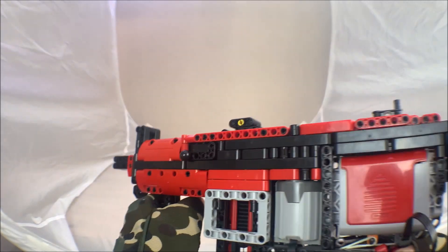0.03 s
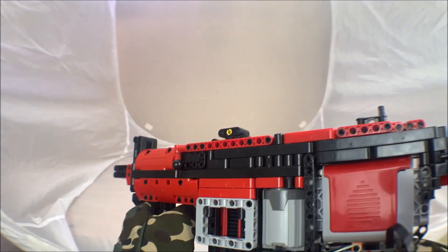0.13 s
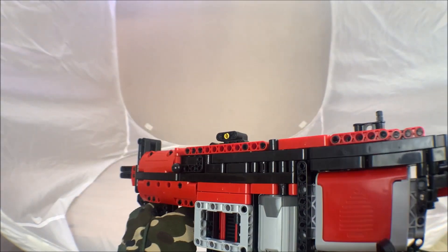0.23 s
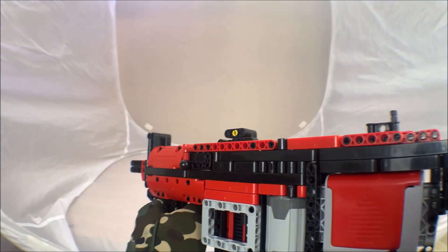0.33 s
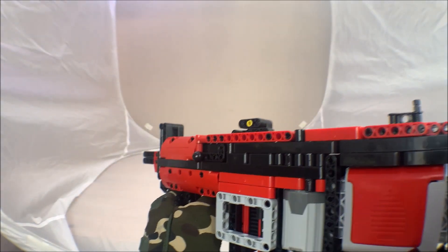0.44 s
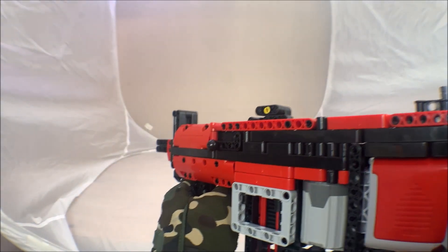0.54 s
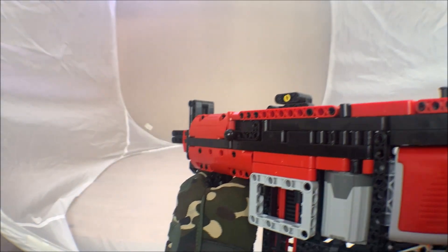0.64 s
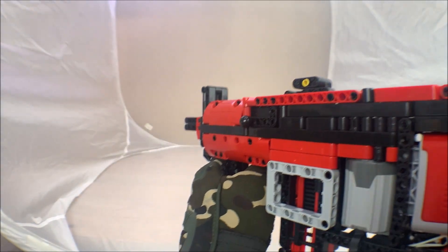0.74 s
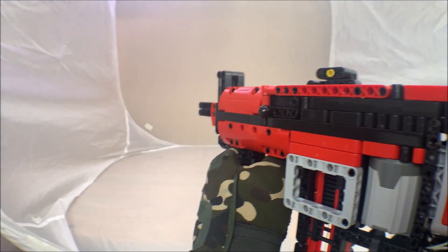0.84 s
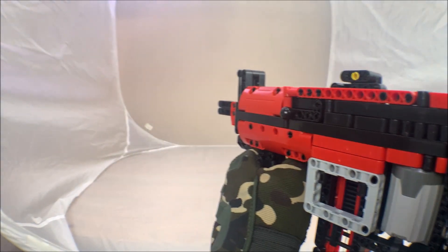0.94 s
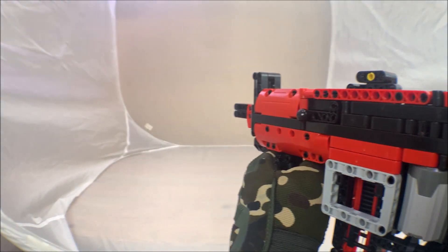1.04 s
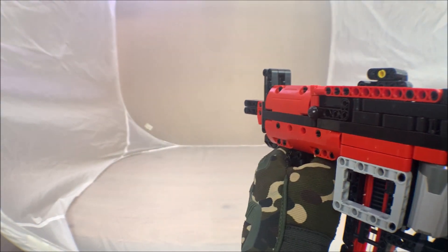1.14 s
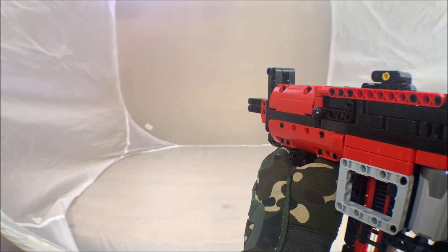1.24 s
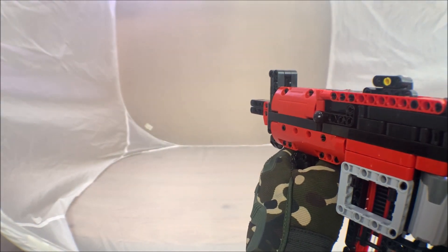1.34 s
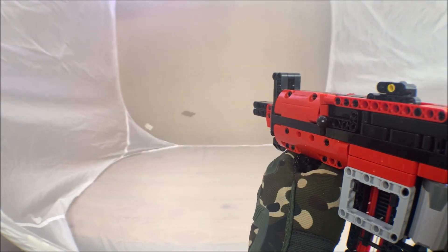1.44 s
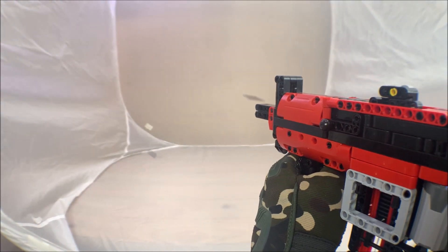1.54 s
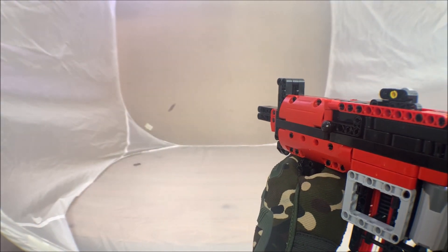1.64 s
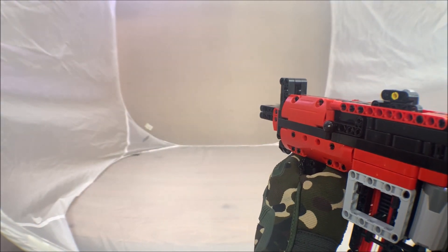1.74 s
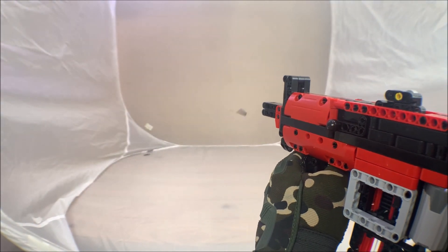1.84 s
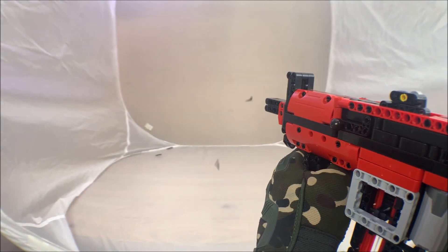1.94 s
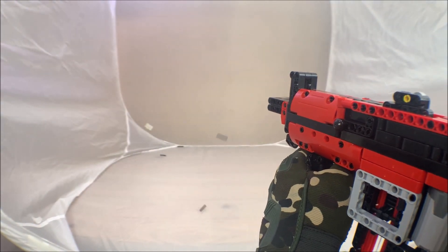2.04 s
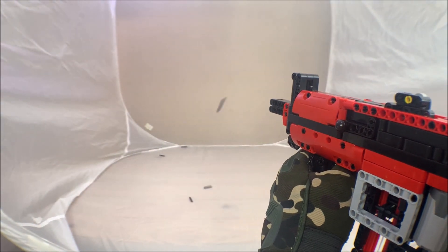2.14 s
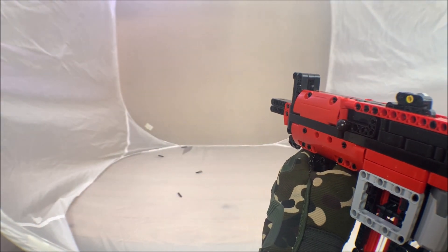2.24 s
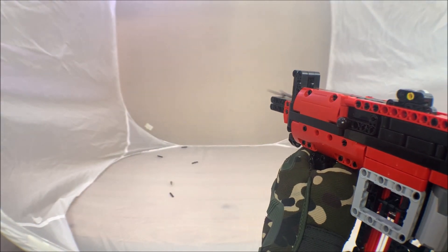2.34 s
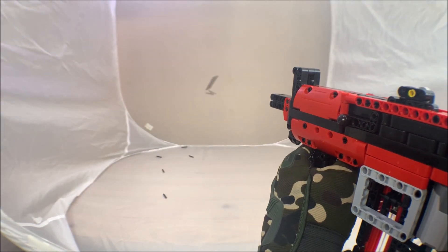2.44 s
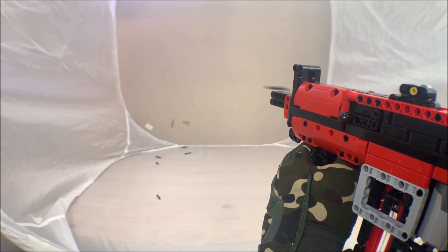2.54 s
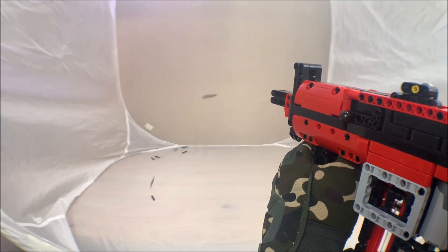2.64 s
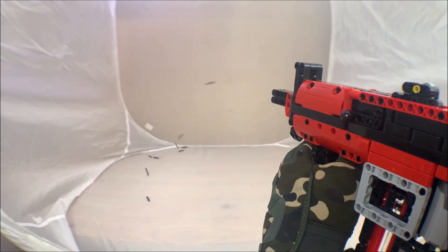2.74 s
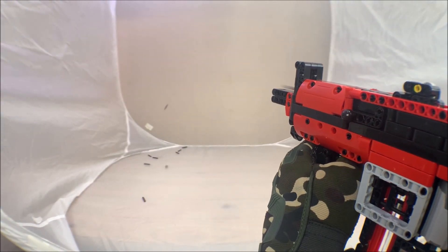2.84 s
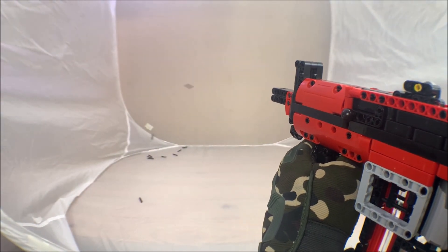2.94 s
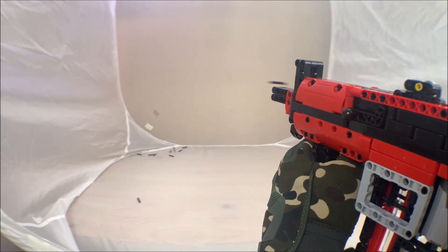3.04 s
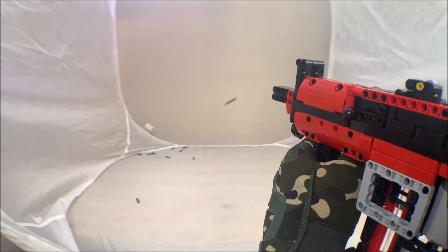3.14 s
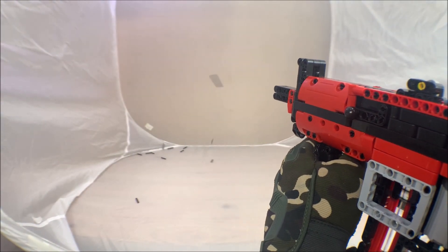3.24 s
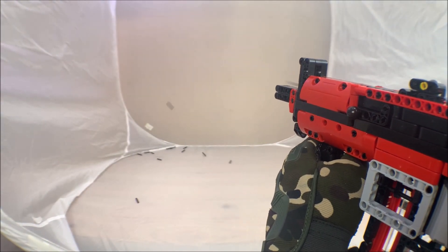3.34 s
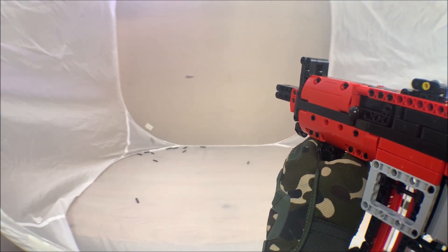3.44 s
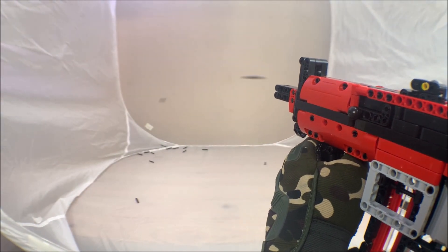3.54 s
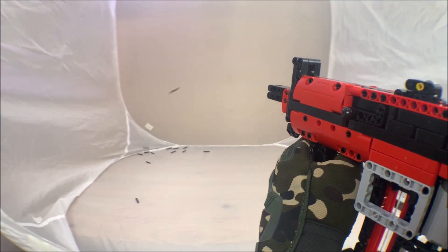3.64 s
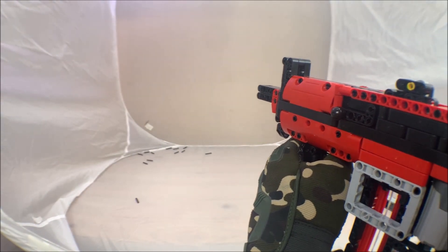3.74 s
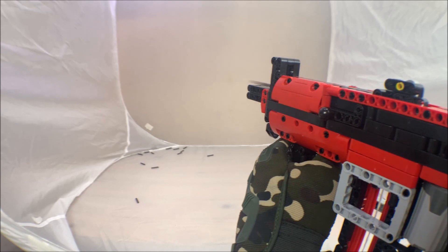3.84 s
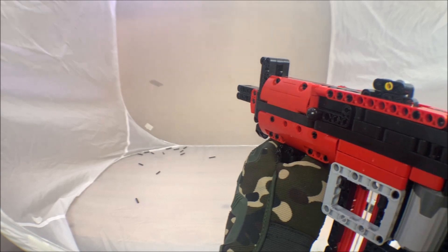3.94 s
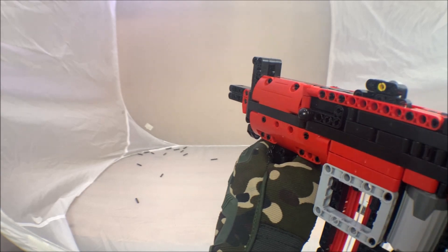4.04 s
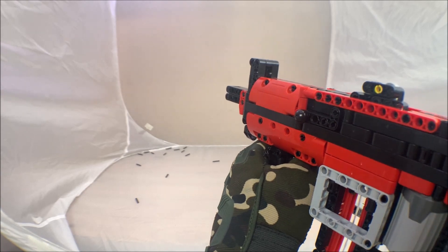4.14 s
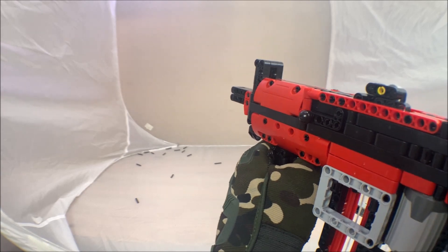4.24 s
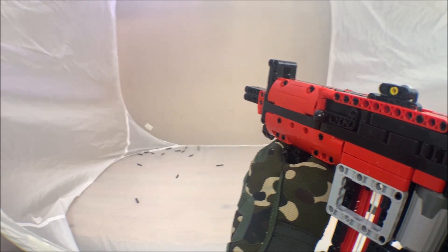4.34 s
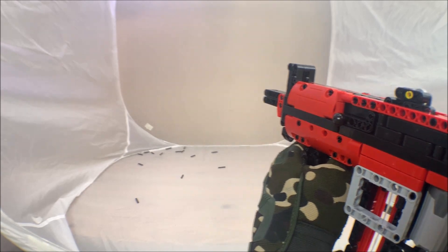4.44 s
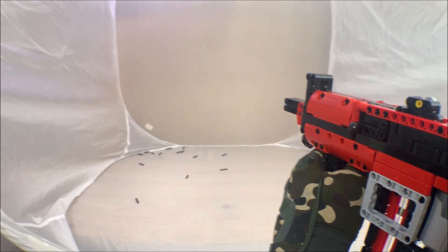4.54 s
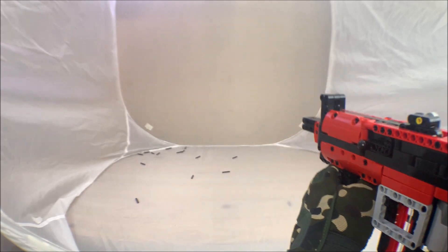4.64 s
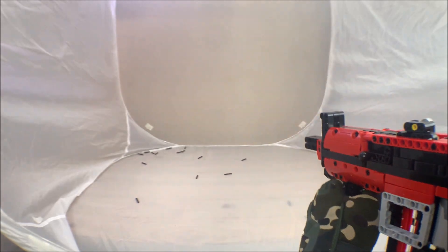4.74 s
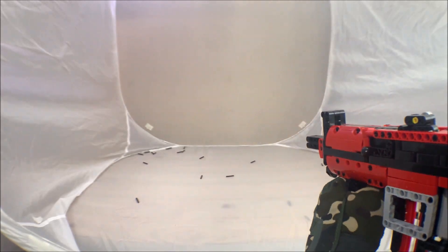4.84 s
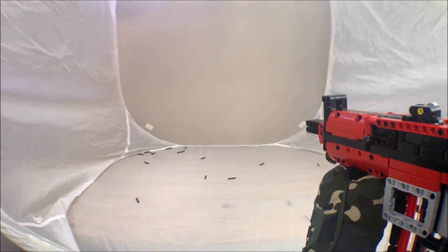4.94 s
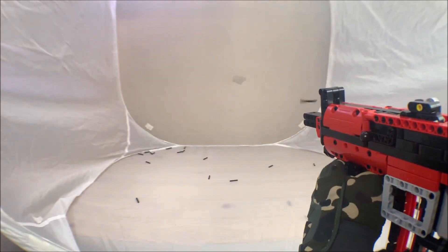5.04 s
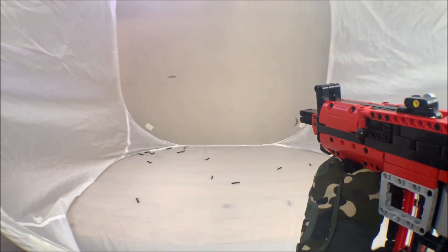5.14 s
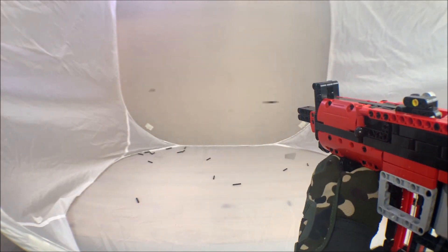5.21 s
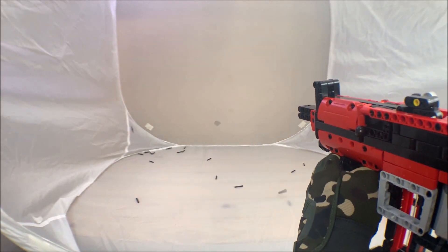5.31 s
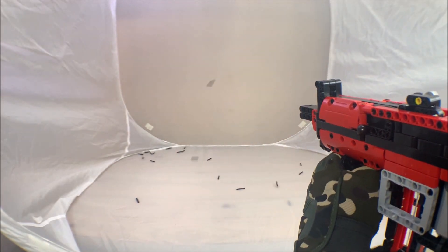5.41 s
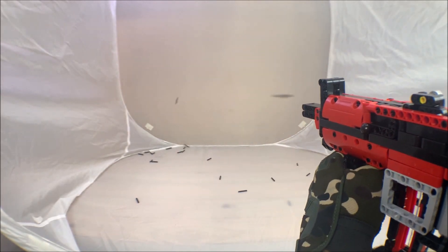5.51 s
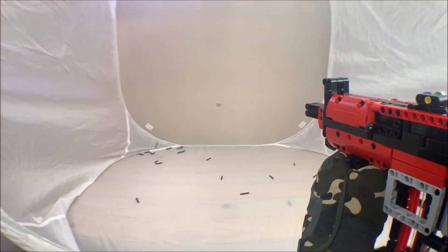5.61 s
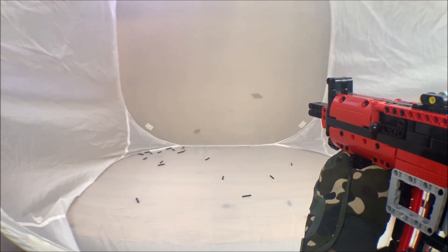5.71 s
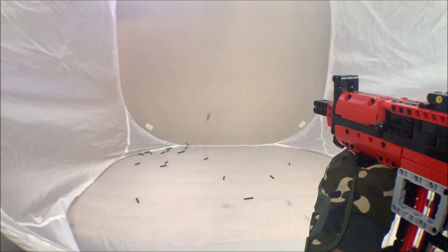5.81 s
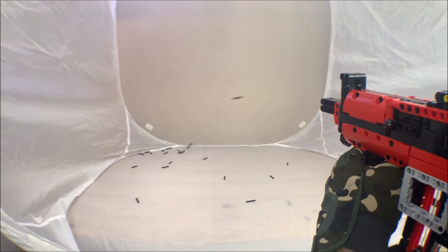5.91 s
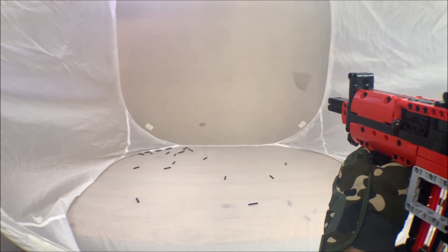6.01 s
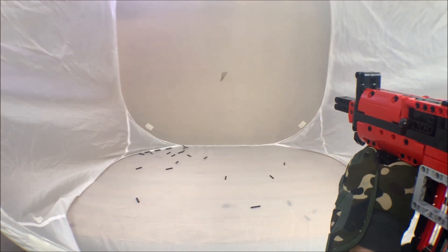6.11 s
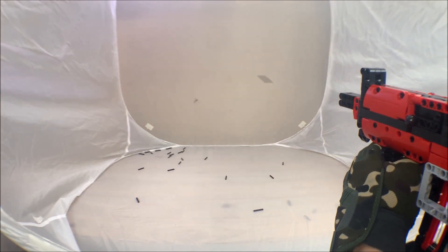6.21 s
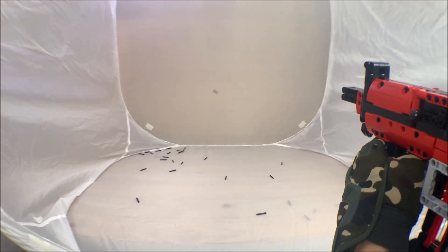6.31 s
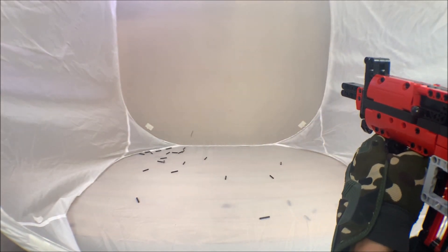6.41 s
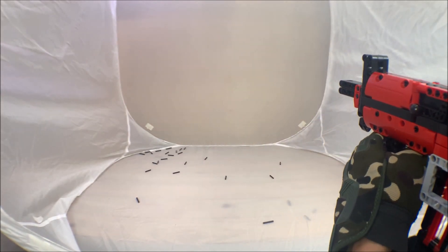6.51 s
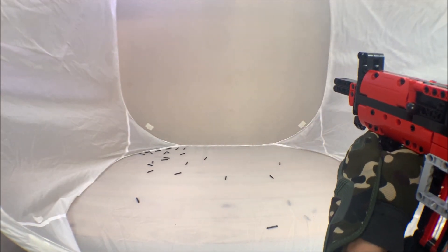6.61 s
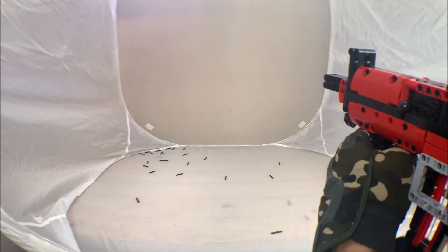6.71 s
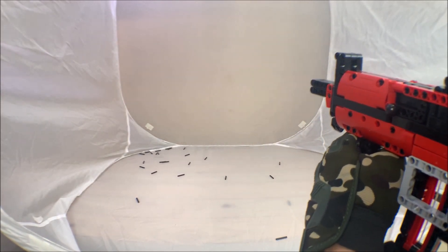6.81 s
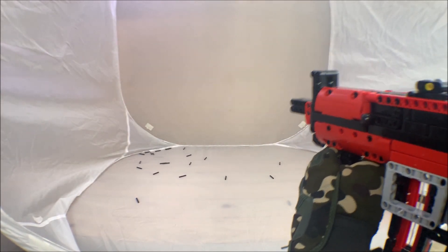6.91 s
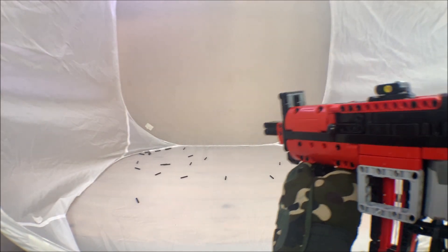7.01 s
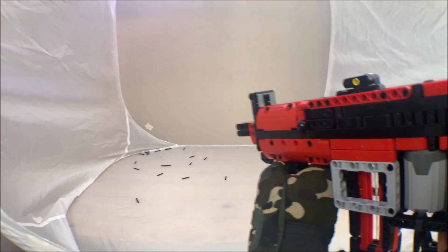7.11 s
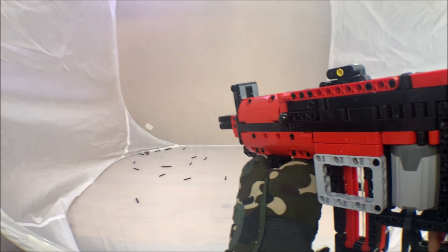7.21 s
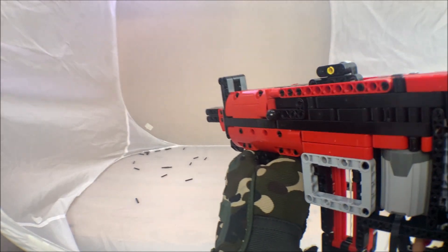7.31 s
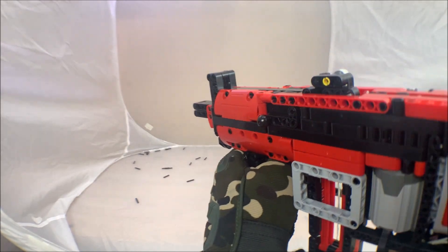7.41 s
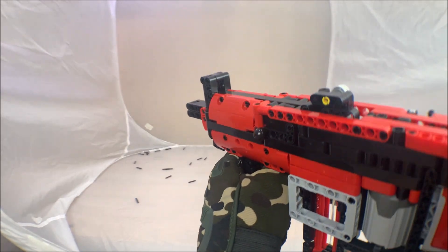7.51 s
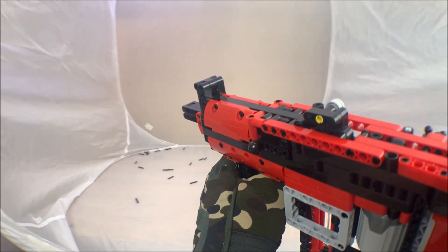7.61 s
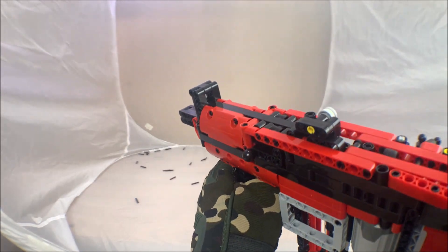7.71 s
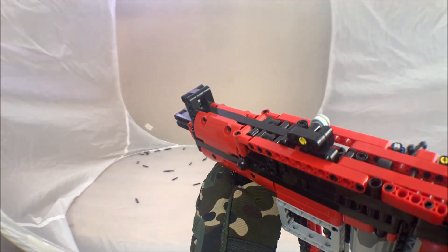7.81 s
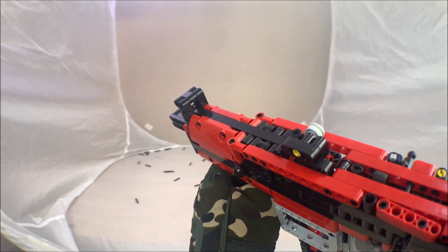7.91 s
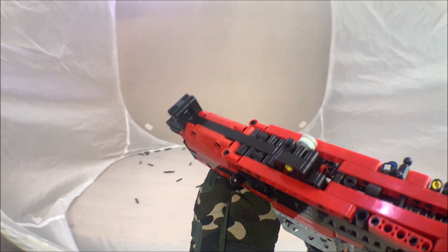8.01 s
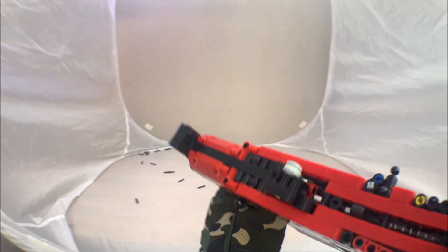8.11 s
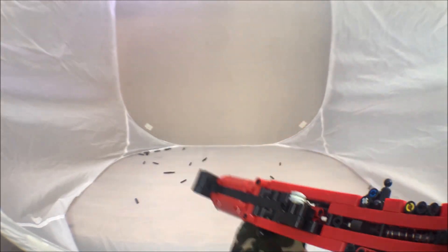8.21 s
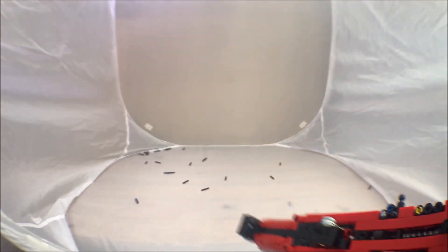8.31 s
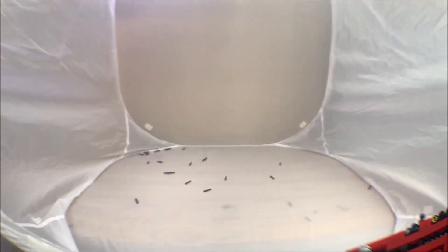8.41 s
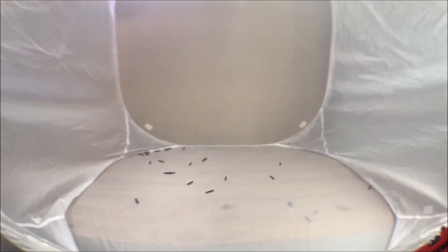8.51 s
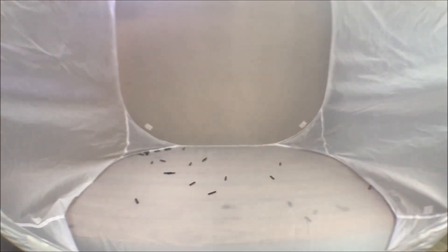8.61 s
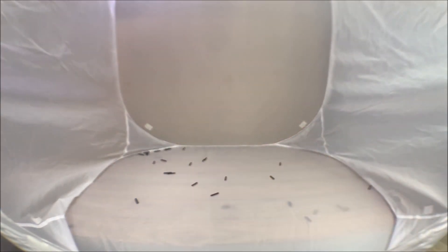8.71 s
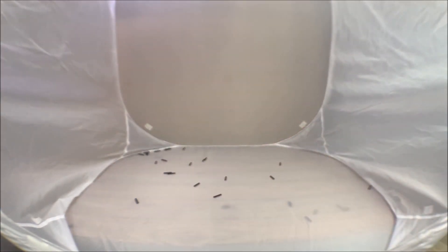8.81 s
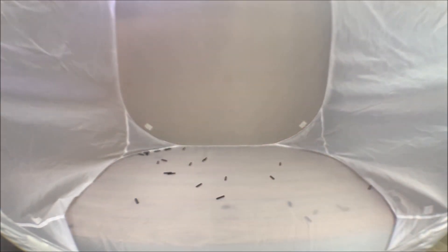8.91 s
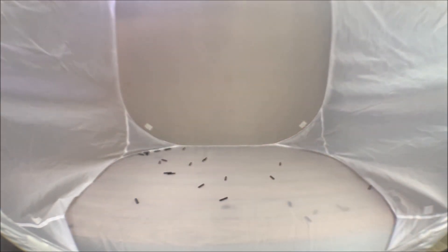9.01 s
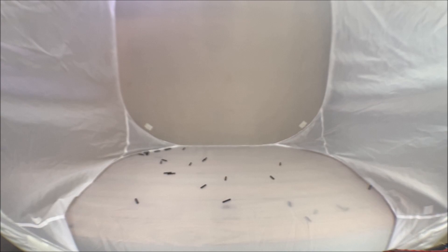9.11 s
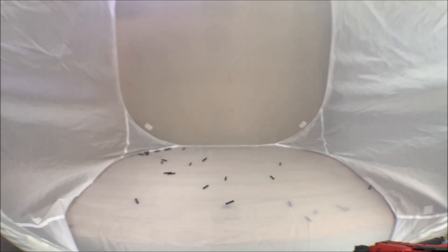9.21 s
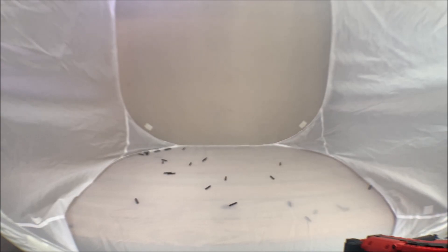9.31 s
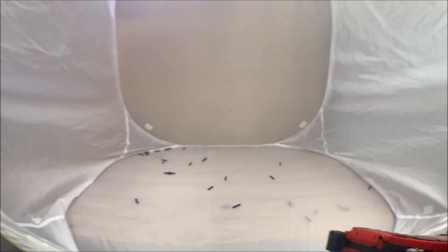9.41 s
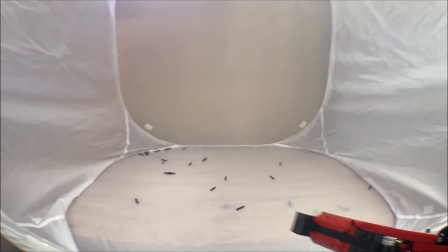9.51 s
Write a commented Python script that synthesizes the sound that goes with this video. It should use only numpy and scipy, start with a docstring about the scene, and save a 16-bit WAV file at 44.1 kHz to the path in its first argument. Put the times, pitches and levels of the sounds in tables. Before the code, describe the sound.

After a second of quiet handling, a toy gun of plastic bricks fires continuously for about six seconds. Each shot is a bright, rattling snap and clack with a short hollow boom, between grinding gear chatter and a pulsing motor whine. Magazine clicks fill the gaps early on, with occasional dull fabric thuds. It stops suddenly; small handling clicks and low room noise remain. Close microphones, short tent reflections and a modest room tail.

```python
"""Motor-driven brick gun in a cloth tent

A gun of plastic bricks fires about six shots a second indoors: noise contacts under impact envelopes
excite the frame. Gear harmonics and tooth noise rise and sag in pitch as the motor draws the spring.
Short noise bursts click in the magazine and thud into the cloth; before and after, the gun ticks and
rubs in a gloved hand. Hum, hiss and rumble lie beneath, and changing echoes surround the gun."""
import sys
import numpy as np
from scipy import signal
from scipy.fft import rfft, irfft, next_fast_len
from scipy.io import wavfile
from scipy.ndimage import uniform_filter1d

SR = 44100
rng = np.random.default_rng(int(sys.argv[2]) if len(sys.argv) > 2 else 0)


def unload_wav(signal):
    """Save mono or channel-first audio to the path in sys.argv[1] as 16-bit WAV at rate SR, clipped to [-1, 1]."""
    wavfile.write(
        sys.argv[1],
        SR,
        np.round(np.clip(np.atleast_2d(signal).T, -1, 1) * 32767).astype(np.int16),
    )


N = 421141
TIME = np.arange(N) / SR

# All levels are relative; the gains of each source and the panning come on top.
# room rumble and hiss, spectrum: (frequency [Hz], level [dB])
FLOOR_COLOUR = [(20, -20), (50, -0.5), (120, -3.5), (240, -5.5), (400, -13.5), (700, -21.5), (1100, -25),
                (1500, -31.5), (2300, -34), (3600, -39.5), (7000, -39), (14000, -46)]
# course of the room noise: (time [s], level [dB])
FLOOR_LEVEL = [(0, -62), (1.2, -65), (7.4, -68), (7.7, -70.5), (9.55, -69.5)]
# narrow bands of hiss in the room's machine hum: (frequency [Hz], width [Hz], level at the end [dB])
HUM_BANDS = [(65.9, 12, -80.5), (1020, 89, -83), (2030, 44, -80.5), (2182, 58, -86), (3160, 50, -89)]
# steady tones of the same hum: (frequency [Hz], level at the end [dB])
HUM_TONES = [(953, -89), (1066, -93), (1879, -93), (2062, -87), (2250, -84), (2815, -97), (3187, -88.5)]
HUM_SKEW = 0.087  # spread of the tone phase in each microphone [cycles]
# bumps and rumbles of the hand: (start [s], length [s], level [dB])
BUMPS = [(0, .25, -67), (.54, 0.025, -58), (.625, .055, -53.5), (1.13, .11, -54.5), (9.41, .06, -63)]

# spectrum of the echoes: (frequency [Hz], level [dB])
ECHO_COLOUR = [(100, 2), (500, 2), (2000, 6.5), (5000, 4), (9000, -4), (15000, -4.5)]
ROOM_T60_S, ROOM_DB, TENT_T60_S, TENT_DB = 0.3, -10.5, 0.024, -4

# strokes of the glove over the bricks: (start [s], length [s], level [dB])
RUBS = [(0, 0.025, -67), (.12, 0.48, -76), (1.07, 0.045, -70), (8.38, 0.22, -81.5), (8.68, 0.046, -73.5),
        (8.9, .06, -81)]
# spectrum of the rubbing cloth: (frequency [Hz], level [dB])
RUB_COLOUR = [(300, -8), (1800, 7.5), (3500, -1.5), (6000, -1.5), (10000, -1), (13500, 2), (15000, -12)]
GRIP_DB = -92  # faint rub of the glove at rest
# one squeak whose pitch rises and falls in an arch
SQUEAK_S, SQUEAK_LENGTH_S, SQUEAK_HZ, SQUEAK_ARCH_HZ = .15, .28, 12450, 600

# dull knocks of pins on the cloth and of the hand: (time [s], energy [dB], pitch [Hz])
KNOCKS = [(.14, -38, 1700), (.99, -35.5, 1600), (1.166, -14, 1750), (3.177, -17.5, 1030),
          (3.525, -11, 1690), (3.609, -16.5, 850), (4.153, -26, 604), (5.306, -17.5, 750),
          (5.622, -17.5, 550), (5.798, -13.5, 980), (5.999, -24, 500), (6.306, -16, 645),
          (6.426, -14.5, 474), (7.925, -32, 1780), (8.048, -39, 1800), (8.064, -43, 1800),
          (8.283, -43, 2004), (8.345, -47.5, 1700), (8.684, -46, 2000), (9.535, -46, 1600)]
# spectrum of the thudding tent cloth: (frequency [Hz], level [dB])
CLOTH_COLOUR = [(50, -15.5), (130, -0.5), (260, -4.5), (450, -0.5), (900, -11), (2000, -40)]

# clicks of trigger, magazine and brick joints: (time [s], energy [dB])
CLICKS = [(.14, -34), (.58, -42), (0.8591, -29), (.966, -43), (1.094, -36), (1.1381, -19), (1.155, -30),
          (1.166, -10), (1.197, -21), (1.933, -11), (3.0803, -14), (4.9844, -17.5), (5.1757, -16.5),
          (5.3102, -12), (5.3196, -8), (5.4408, -14), (5.497, -18), (5.64, -13.5), (5.813, -14),
          (5.9888, -18), (7.925, -28.5), (8.047, -44), (8.0638, -42), (8.1797, -38.5), (8.3809, -42.5),
          (8.683, -43)]
# spectrum of the clicks: (frequency [Hz], level [dB])
CLICK_COLOUR = [(100, -62), (700, -13.5), (2000, 1), (4000, -1), (7000, 3.5), (12000, 9), (14500, 6.5),
                (17000, -5.5)]
# a pin is pushed up and seated: (share of the cycle [1], energy [dB], scatter of the time [s])
FEED = [(.628, -8.5, .0005), (.765, -11, .003)]
FEED_ENDS_S, FEED_SCATTER_DB = 3.9, 2

# one stroke of the bolt: (share of the cycle [1], gear mesh rate [Hz], whine [dB], chatter [dB])
STROKE = [(0, 550.3, -40, 6.5), (.2, 691, -11.5, -1.5), (.38, 758.2, -4.5, -1.5), (.56, 759.3, -1, 7.5),
          (.7, 680, 3, 5.5), (.84, 570.3, 0.5, 5.5), (1, 535, 2.5, -1.5)]
# harmonics of the gear whine: (multiple of the mesh rate [1], level [dB])
MESH_HARMONICS = [(2, -2), (3, -2), (4, 0), (5, -8), (6, -6), (7, -10.5), (8, -14)]
# meshing gear pairs: (turning ratio [1], level [dB])
GEAR_PAIRS = [(1, 0), (.83, -14)]
# spectrum of the tooth chatter: (frequency [Hz], level [dB])
CHATTER_COLOUR = [(80, -26), (300, -20.5), (800, -9), (1150, -12), (1600, 3.5), (2600, 1), (3400, -2),
                  (6000, -2), (9000, 7.5), (12500, -3), (14500, -1.5), (16000, -17)]
# the motor: switched on and off, running level, first jolt, run-up and dying away
MOTOR_ON_S, MOTOR_OFF_S = 1.16, 7.465
MOTOR_DB, JOLT_DB, JOLT_S, RUN_UP_S, COAST_DB_PER_S = -50, -51, .045, .24, 400
# broad resonance of the gear housing
GROWL_HZ, GROWL_WIDTH_HZ, GROWL_DB, GROWL_FADE_S = 2200, 650, -62, .3

# slams of the bolt: (time [s], energy [dB])
SLAMS = [(1.369, 5.5), (1.5559, 7), (1.7216, 5), (1.8893, 5.5), (2.047, 6), (2.213, 5), (2.376, 4.5),
         (2.5426, 4.5), (2.7072, 6), (2.8745, 6), (3.0404, 5), (3.2102, 4.5), (3.3804, 5.5), (3.5468, 3.5),
         (3.7126, 5.5), (3.7392, -1.5), (3.8775, 5), (4.044, 5.5), (4.2102, 5.5), (4.378, 4.5), (4.546, 5),
         (4.7138, 6), (4.8847, 1.85), (5.047, 4.5), (5.2078, 3), (5.369, 5.5), (5.536, 5), (5.6996, 3.5),
         (5.8688, 5.5), (6.034, 6), (6.2049, 5.5), (6.372, 5), (6.541, 6), (6.712, 5), (6.8765, 5),
         (7.0432, 5), (7.209, 6.5), (7.375, 6)]
# resonances of the brick frame: (frequency [Hz], width [Hz], lift [dB])
FRAME = [(346, 110, 8.5), (482, 120, 8), (778, 72, 6.5), (1080, 740, 2), (1562.7, 420, -4.5),
         (2260, 110, -1), (2930, 160, 1.5), (4300, 620, 2), (5710, 500, 3), (8260, 250, 5),
         (11100, 616, 2.5), (13680, 550, -0.5)]
# spectra of boom, clack and snap: (frequency [Hz], level [dB])
BOOM_COLOUR = [(60, -27), (200, -16), (400, -9), (900, -3.5), (1800, 8), (2700, 0.5), (4000, 4.5),
               (8000, -37)]
CLACK_COLOUR = [(1200, -35.5), (2600, -3.5), (3500, -10), (4600, -3), (7000, 2), (9000, 4.5), (10500, -6),
                (15000, -27.5)]
SNAP_COLOUR = [(4000, -41), (8000, -13.5), (10000, -5.5), (11700, -6), (13300, -0.5), (14400, -7.5),
               (15500, -16.5), (17000, -27)]
FRAME_RING_HZ, FRAME_RING_WIDTH_HZ = 2230, 150
# the bolt rebounds for a shorter time as the burst goes on
REBOUNDS_FIRST_S, REBOUNDS_LAST_S = .0052, 0.003
CLACK_DB, BOOM_DB = -5.5, -14  # slam strength in the clack of the bricks and the boom of the frame

# how much later each part is heard on the left; the cloth hangs to the left
FRAME_LAG_S, MUZZLE_LAG_S, NOSE_LAG_S, CLOTH_LAG_S = .000488, .0003, .00018, -0.00015
CUTOFF_HZ = 16000


def from_db(db):
    """Amplitude ratio: twenty decibels to a factor of ten."""
    return 10 ** (np.asarray(db) / 20)


def rms_one(x):
    """Normalise the mean power to one."""
    return x / np.sqrt(np.mean(x ** 2) + 1e-20)


def unit(x):
    """Normalise the energy to one."""
    return x / np.sqrt(np.sum(x ** 2, axis=-1, keepdims=True) + 1e-20)


def curve(rows, at=TIME):
    """Linear interpolation of every column of a table over its first column."""
    first, *columns = np.transpose(rows)
    return [np.interp(at, first, column) for column in columns]


def drift(rate):
    """Random modulation: normal values, `rate` per second, joined by lines and scaled to rms one."""
    knots = rng.standard_normal(int(TIME[-1] * rate) + 2)
    return rms_one(np.interp(TIME * rate, np.arange(len(knots)), knots))


def response(colour, modes=(), size=8192):
    """Minimum phase: the folded cepstrum of a spectrum with resonances gives a causal impulse response."""
    hz = np.maximum(np.fft.rfftfreq(size, 1 / SR), 1)
    points = np.array(colour, float)
    db = np.interp(np.log(hz), np.log(points[:, 0]), points[:, 1])
    for centre, width, lift_db in modes:
        db = db + lift_db / (1 + (2 * (hz - centre) / width) ** 2)
    cepstrum = irfft(np.log(from_db(db)))
    cepstrum[1:size // 2] *= 2
    cepstrum[size // 2 + 1:] = 0
    return unit(irfft(np.exp(rfft(cepstrum))))


def through(x, impulse):
    """Linear filtering: convolve with an impulse response, keeping the length."""
    return signal.oaconvolve(x, impulse)[:N]


def resonate(x, hz, width):
    """Damped resonator: a pole pair whose radius follows from the bandwidth."""
    r = np.exp(-np.pi * width / SR)
    return signal.lfilter([1, 0, -1], [1, -2 * r * np.cos(2 * np.pi * hz / SR), r * r], x)


def band_filter(x, order, hz, kind):
    """Butterworth filtering: a maximally flat pass band."""
    return signal.sosfilt(signal.butter(order, hz, kind, fs=SR, output="sos"), x)


def add(track, s, piece):
    """Superposition: mix a piece into a track at time s."""
    start = max(round(s * SR), 0)
    track[start:start + len(piece)] += piece[:N - start]


def to_microphones(x, lag_s, pan_db):
    """Interaural cues: delay the left channel by lag_s and raise the right over it by pan_db."""
    size = next_fast_len(N, True)
    delay = np.exp(-2j * np.pi * lag_s * np.fft.rfftfreq(size, 1 / SR))
    left = np.fft.irfft(rfft(x, size) * delay)[:N]
    return np.array([left * from_db(-pan_db / 2), x * from_db(pan_db / 2)])


def contacts(count, per_s, spread_db):
    """Shot noise: random tiny contacts of either sign and uneven size."""
    struck = rng.random(count) < per_s / SR
    signs = rng.choice([-1, 1], count)
    return struck * signs * from_db(spread_db * np.clip(rng.standard_normal(count), -2, 2))


def swells(rows, attack_s, release_s):
    """Exponential envelopes: each (start, length, dB) event rises, holds and dies away."""
    gain = np.zeros(N)
    for s, length, db in rows:
        before = np.maximum(s - TIME, 0) / attack_s
        after = np.maximum(TIME - s - length, 0) / release_s
        gain += from_db(db) * np.exp(-before - after)
    return gain


def stereo_noise(side_db):
    """Partial coherence: white noise from a common middle and an opposed side part of level side_db."""
    mid, side = rng.standard_normal((2, N))
    return np.array([mid + from_db(side_db) * side, mid - from_db(side_db) * side])


def background():
    """Stationary noise and tones: room rumble and hiss, a narrow hum, and bumps of the hand."""
    air = rms_one(np.array([through(c, response(FLOOR_COLOUR)) for c in stereo_noise(side_db=-7)]))
    white = stereo_noise(side_db=4)
    hum = sum(from_db(db) * rms_one(resonate(white, hz, width)) for hz, width, db in HUM_BANDS)
    for hz, db in HUM_TONES:
        cycles = hz * TIME + rng.random() + HUM_SKEW * rng.standard_normal((2, 1))
        hum = hum + from_db(db) * np.sqrt(2) * np.sin(2 * np.pi * cycles + 0.31 * drift(5.6))
    bumps = rms_one(resonate(resonate(stereo_noise(side_db=-13), 58, 41), 60, 53))
    swell = from_db(curve(FLOOR_LEVEL)[0])
    return swell * air + hum * swell / swell[-1] + swells(BUMPS, attack_s=.015, release_s=0.032) * bumps


def even(x, width_hz):
    """Diffuse field: echoes from all sides favour no pitch, so level the spectrum over a given width."""
    spectrum = rfft(x, 2 * len(x))
    power = uniform_filter1d(np.abs(spectrum) ** 2, max(int(width_hz * 2 * len(x) / SR), 1))
    return unit(irfft(spectrum / np.sqrt(np.abs(power) + 1e-12))[:len(x)])


def echoes():
    """Reverberant decay: quick scatter off gun and tent, then a room tail that dies sooner in the treble."""
    t = np.arange(SR // 2) / SR
    scatter = rng.standard_normal(len(t)) * from_db(-60 * t / TENT_T60_S) * (t > .002)
    near = even(scatter, width_hz=220)
    tail = rng.standard_normal(len(t)) * (1 - np.exp(-t / 0.0058)) * from_db(-60 * t / ROOM_T60_S)
    far = even(tail, width_hz=56)
    dull = signal.lfilter(*signal.butter(1, 5000, fs=SR), far)
    far = unit(dull + (far - dull) * np.exp(-t / 0.34))
    both = (from_db(TENT_DB) * near + from_db(ROOM_DB) * far) * (t > .002)
    return signal.oaconvolve(both, response(ECHO_COLOUR))


def room(x, count=10):
    """Time-varying reverberation: echo patterns cross-fade as the gun is moved about."""
    place = TIME / TIME[-1] * (count - 1)
    shares = [np.sqrt(np.maximum(1 - np.abs(place - k), 0)) for k in range(count)]
    return np.array([sum(through(channel * share, echoes()) for share in shares) for channel in x])


def glove():
    """Stick-slip friction: cloth catches and slips over the studs as a dense train of contacts."""
    fibres = contacts(N, per_s=4700, spread_db=0.5) * from_db(3 * drift(37))
    pressure = from_db(GRIP_DB) + swells(RUBS, attack_s=.012, release_s=0.02)
    rub = pressure * rms_one(through(fibres, response(RUB_COLOUR)))
    return to_microphones(rub, MUZZLE_LAG_S, pan_db=0.5)


def squeak(level_db, waver_hz):
    """Frequency modulation: a thin, high tone arches and wavers as the gun is brought into position."""
    arch = np.sin(np.pi * np.clip((TIME - SQUEAK_S) / SQUEAK_LENGTH_S, 0, 1))
    hz = SQUEAK_HZ + SQUEAK_ARCH_HZ * arch + waver_hz * drift(1500)
    level = swells([(SQUEAK_S, SQUEAK_LENGTH_S, level_db)], attack_s=.006, release_s=.012)
    return level * np.sin(2 * np.pi * np.cumsum(hz) / SR)


def knocks(decay_s, rise_s, width_hz, widening, tail_db, tail_s, thud_db):
    """Soft impact: a tap and flutter in one band, wider when higher; duller ones thud more in the cloth."""
    taps, thuds, t = np.zeros(N), np.zeros(N), np.arange(SR // 8) / SR
    decay = np.exp(-t / decay_s) + from_db(tail_db) * np.exp(-t / tail_s)
    shape = decay * (1 - np.exp(-t / rise_s))
    for s, db, hz in KNOCKS:
        reach_hz = width_hz + widening * hz
        edges_hz = [max(hz / 2, hz - reach_hz), hz + reach_hz]
        tap = band_filter(shape * rng.standard_normal(len(t)), 3, edges_hz, "band")
        add(taps, s - .001, from_db(db) * unit(tap))
        # the hard tip makes a sharp onset
        tip = np.exp(-t / 0.00096) * rng.standard_normal(len(t))
        tip = band_filter(tip, 2, [hz, hz + 1100], "band")
        add(taps, s - .001, from_db(db - 4) * unit(tip))
        thud = unit(shape * rng.standard_normal(len(t)))
        add(thuds, s - .002, from_db(db + thud_db) * 500 / hz * thud)
    return to_microphones(taps + through(thuds, response(CLOTH_COLOUR)), CLOTH_LAG_S, pan_db=-0.5)


def beats():
    """Periodic excitation: strokes begin at the slams, save a second slam right after a shot."""
    times = np.array([s for s, _ in SLAMS])
    return times[np.diff(times, prepend=0) > .1]


def feed():
    """Phase-locked impacts: while the magazine is full, every stroke pushes a pin up and seats it."""
    starts, events = beats(), []
    for start, end in zip(starts, starts[1:]):
        if start + .1 < FEED_ENDS_S:
            for share, db, scatter_s in FEED:
                s = start + share * (end - start) + scatter_s * rng.standard_normal()
                events.append((s, db + FEED_SCATTER_DB * rng.standard_normal()))
    return events


def clicks(settle_s, bounce_db, bounce_s):
    """Damped impact: a small part snaps into place and buzzes for a moment."""
    track, t = np.zeros(N), np.arange(SR // 50) / SR
    shake = np.exp(-t / settle_s) + from_db(bounce_db) * np.exp(-t / bounce_s)
    for s, db in CLICKS + feed():
        add(track, s - .0004, from_db(db) * unit(shake * rng.standard_normal(len(t))))
    return to_microphones(through(track, response(CLICK_COLOUR, FRAME)), MUZZLE_LAG_S, pan_db=1.6)


def motor_level():
    """Transient and steady state: the gears jolt at the start, grow louder and quickly die away."""
    running_s = np.maximum(TIME - MOTOR_ON_S, 0)
    jolt = from_db(JOLT_DB) * np.exp(-running_s / JOLT_S) * (running_s > 0)
    steady = from_db(MOTOR_DB) * (1 - np.exp(-(running_s / RUN_UP_S) ** 2))
    return (jolt + steady) * from_db(-COAST_DB_PER_S * np.maximum(TIME - MOTOR_OFF_S, 0))


def growl():
    """Forced resonance: slack teeth knock against the housing as the motor runs up, then fade."""
    level = swells([(MOTOR_ON_S, RUN_UP_S, GROWL_DB)], attack_s=0.005, release_s=GROWL_FADE_S)
    teeth = contacts(N, per_s=900, spread_db=4) * from_db(2.7 * drift(45))
    housing = resonate(resonate(teeth, GROWL_HZ, GROWL_WIDTH_HZ), GROWL_HZ, 2 * GROWL_WIDTH_HZ)
    return level * rms_one(housing)


def gears(whine_db, chatter_db, tooth_depth, wobble, roughness_db, tick_db):
    """Gear meshing: the motor races when the bolt is freed and slows as the spring loads it again."""
    starts = beats()
    starts = np.r_[MOTOR_ON_S, starts, 2 * starts[-1] - starts[-2]]
    share = np.interp(TIME, starts, np.arange(len(starts))) % 1
    mesh_hz, tone_db, load_db = curve(STROKE, share)
    # the mesh rate starts at half and approaches its full value
    spin_up = 1 - .5 * np.exp(-np.maximum(TIME - MOTOR_ON_S, 0) / .12)
    unsteady_hz = mesh_hz * spin_up * (1 + wobble * drift(9) + .008 * drift(300))
    phase = 2 * np.pi * np.cumsum(unsteady_hz) / SR
    level = motor_level()
    whine = np.zeros(N)
    for multiple, db in MESH_HARMONICS:
        for ratio, pair_db in GEAR_PAIRS:
            gain = from_db(db + pair_db + roughness_db * drift(160) + 2 * drift(30))
            whine += gain * np.sin(multiple * ratio * phase + .4 * drift(260))
    whine_colour = [(900, -24.5), (1200, -7.5), (1500, -.5), (2300, 1.5), (3300, -2.5), (5000, -2.5)]
    whine = rms_one(through(whine, response(whine_colour, FRAME)))
    whine = from_db(whine_db + tone_db) * whine * level * spin_up ** 5 + growl()
    # each tooth scrapes as it engages, and the play in the axles makes them uneven
    scrape = contacts(N, per_s=7000, spread_db=4.5) * np.exp(tooth_depth * np.cos(phase))
    scrape = scrape * from_db(2 * drift(220) + 2.2 * drift(35) + load_db)
    ticks = rms_one(contacts(N, per_s=130, spread_db=3))
    teeth = rms_one(scrape) + from_db(tick_db) * ticks
    chatter = from_db(chatter_db) * rms_one(through(teeth, response(CHATTER_COLOUR, FRAME))) * level
    body = band_filter(chatter, 2, 7500, "low")
    bright = band_filter(chatter, 2, 7500, "high")
    # the treble is added with opposite polarity
    return (to_microphones(body, FRAME_LAG_S, pan_db=3.5)
            + to_microphones(whine, FRAME_LAG_S, pan_db=-2.5)
            - to_microphones(bright, MUZZLE_LAG_S, pan_db=-3.5))


def slams(level_db, scatter_db, lead_s, lead_db, rise_s, rebound_s, rattle_s, rattle_db, late_s):
    """Repeated impact: the bolt scrapes forward, hits and rebounds twice, shaking a swarm of loose joints."""
    track, t = np.zeros(N), np.arange(-SR // 50, SR // 15) / SR
    rebound_spans_s = np.linspace(REBOUNDS_FIRST_S, REBOUNDS_LAST_S, len(SLAMS))
    scrape = from_db(lead_db) * np.exp(-np.abs(t) / lead_s)
    rattle = from_db(rattle_db) * np.exp(-np.abs(t) / rattle_s)
    for (s, db), span_s in zip(SLAMS, rebound_spans_s):
        blows = span_s * np.array([0, rng.uniform(0.28, .55), rng.uniform(0.85, 1)])
        forces = from_db(np.array([0, -1.5, -4]) + rng.normal(0, 2.1, len(blows)))
        # the catch clicks just before, and loose bricks fall back just after
        blows = np.r_[blows, -rng.uniform(.004, .010), rng.uniform(.007, .028, size=3)]
        forces = np.r_[forces, from_db(rng.normal(-19, 3, size=4))]
        shake = np.where(t < 0, scrape, rattle)
        for blow, force in zip(blows, forces):
            shake = shake + force * np.exp(-np.abs(t - blow) / np.where(t < blow, rise_s, rebound_s))
        strength = from_db(db + level_db + scatter_db * rng.standard_normal())
        joints = contacts(len(t), per_s=22000, spread_db=2)
        add(track, s + t[0] + late_s, strength * unit(shake * joints))
    return track


def frame_end():
    """Low-frequency radiation: one end of the frame booms with slow blows and a long rattle."""
    blows = slams(BOOM_DB, scatter_db=1.3, lead_s=.005, lead_db=-10, rise_s=0.0016, rebound_s=0.0027,
                  rattle_s=0.053, rattle_db=-15.5, late_s=.0003)
    return through(blows, response(BOOM_COLOUR, FRAME))


def bolt():
    """Modal excitation: the muzzle snaps, the bricks clack, both frame ends boom and the rear rings."""
    snap = slams(level_db=0, scatter_db=0.7, lead_s=.003, lead_db=-20, rise_s=.0004, rebound_s=.0014,
                 rattle_s=0.006, rattle_db=-16.5, late_s=0)
    snap = through(snap, response(SNAP_COLOUR, FRAME))
    clack = slams(CLACK_DB, scatter_db=1.27, lead_s=0.0062, lead_db=-12, rise_s=0.00036, rebound_s=.002,
                  rattle_s=0.0077, rattle_db=-20, late_s=.0002)
    clack = through(clack, response(CLACK_COLOUR, FRAME))
    rear, front = frame_end(), frame_end()
    ring = rms_one(resonate(rear, FRAME_RING_HZ, FRAME_RING_WIDTH_HZ)) * np.std(rear)
    return (from_db(-2) * to_microphones(snap, MUZZLE_LAG_S, pan_db=0.4)
            + from_db(-1.0) * to_microphones(clack, FRAME_LAG_S, pan_db=3)
            + from_db(-5.5) * to_microphones(rear, FRAME_LAG_S, pan_db=0.0)
            + from_db(-6.5) * to_microphones(front, NOSE_LAG_S, pan_db=1.5)
            + from_db(-14) * to_microphones(ring, FRAME_LAG_S, pan_db=-7.5))


def scene():
    """Superposition of direct sound, reverberation and background."""
    gun = bolt() + clicks(settle_s=0.00076, bounce_db=-19.5, bounce_s=0.005) + glove()
    drive = gears(whine_db=-8.0, chatter_db=-2, tooth_depth=0.38, wobble=.012, roughness_db=4.5,
                  tick_db=-10.0)
    cloth = knocks(decay_s=0.003, rise_s=0.0007, width_hz=320, widening=.17, tail_db=-19, tail_s=0.026,
                   thud_db=-8.0)
    wet = room(gun + from_db(4) * drive + from_db(-0.5) * cloth)
    return gun + drive + cloth + wet + background() + squeak(level_db=-69.0, waver_hz=220)


def record(dry):
    """Band limitation: a steep elliptic low-pass cuts the top."""
    return signal.sosfilt(signal.ellip(10, .2, 80, CUTOFF_HZ, fs=SR, output="sos"), dry)


dry = scene()
out = record(dry)
unload_wav(out)
```